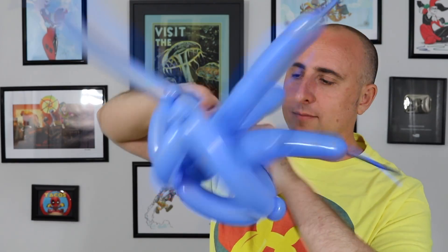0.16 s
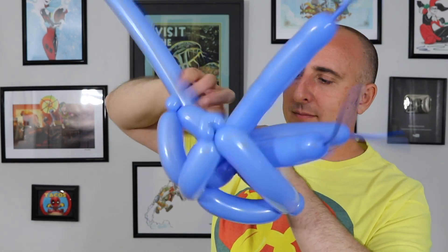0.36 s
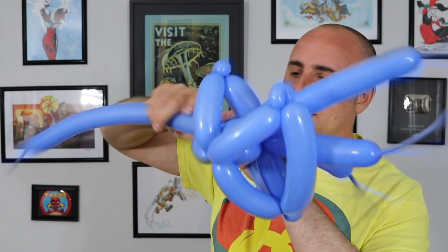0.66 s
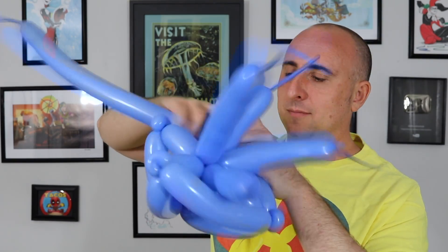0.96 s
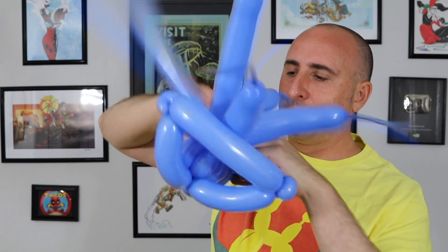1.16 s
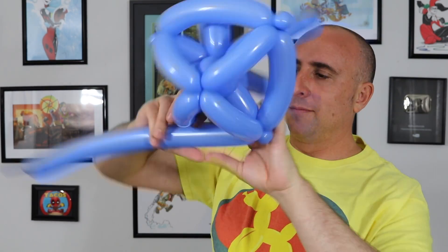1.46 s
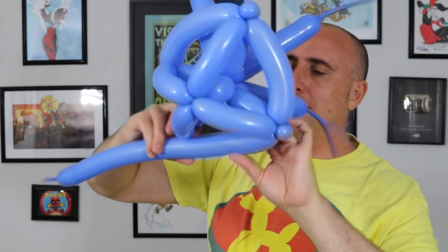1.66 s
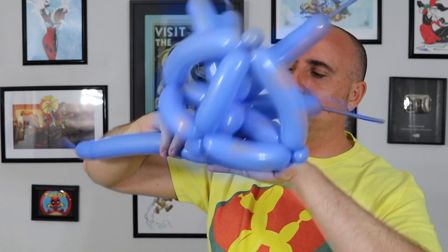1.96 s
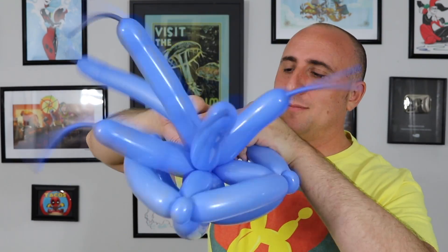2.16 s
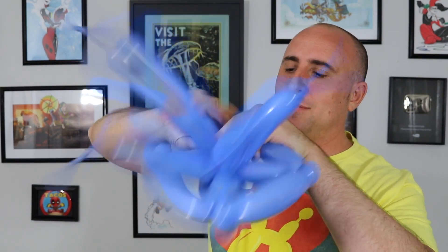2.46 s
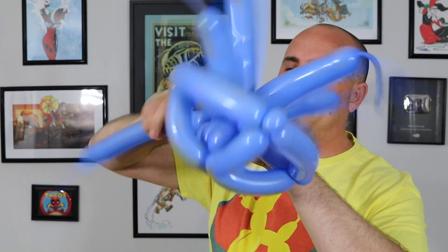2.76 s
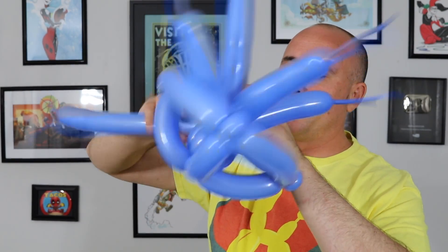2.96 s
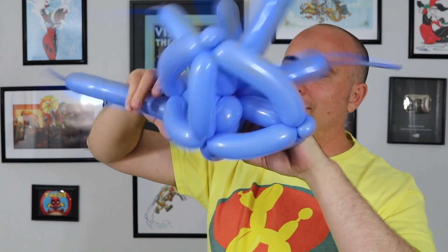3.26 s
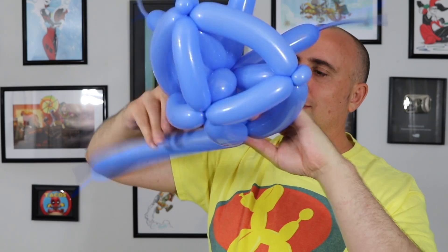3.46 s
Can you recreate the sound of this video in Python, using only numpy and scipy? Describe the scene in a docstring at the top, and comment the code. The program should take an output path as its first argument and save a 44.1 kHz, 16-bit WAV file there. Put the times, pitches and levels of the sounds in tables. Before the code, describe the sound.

Inflated rubber balloons rub, creak and squeak as hands twist them together in a small room

```python
"""A small room, the microphone close to inflated latex balloons that are being twisted together.
Rubber sticks and slips: each slip cracks the taut skin and rings the air inside. Slow slips creak,
fast ones scrape, regular ones squeak; snaps and separate creak pulses are short cracks of rubber
letting go. Hands brush the skins throughout, and a soft knock sounds near the end. Short
reverberation and faint room air surround it all."""
import sys
import numpy as np
from scipy import signal
from scipy.fft import rfft, irfft, next_fast_len
from scipy.io import wavfile

SR = 44100
rng = np.random.default_rng(int(sys.argv[2]) if len(sys.argv) > 2 else 0)


def wav_record(signal):
    """Record a signal, one row per channel, as 16-bit PCM in the file named by sys.argv[1]."""
    frames = np.transpose(np.atleast_2d(signal))
    bounded = np.clip(frames, -1, 1)
    # unit amplitude maps onto the largest positive 16-bit level
    quanta = np.round(bounded * 32767).astype(np.int16)
    wavfile.write(sys.argv[1], SR, quanta)


N = 158760  # 3.6 s
TOP_HZ = 15750  # upper limit of the sound


def undb(db):
    """Amplitude ratio of a level in dB."""
    return 10 ** (np.asarray(db) / 20)


def unit(x):
    """Scales a signal to an RMS of 1."""
    return x / np.sqrt(np.mean(x ** 2) + 1e-20)


def gain_at(hz, points):
    """Gain of a (freq_hz, level_db) curve, straight over log frequency."""
    points = np.array(points)
    return undb(np.interp(np.log(hz + 1), np.log(points[:, 0]), points[:, 1]))


def colour(x, points):
    """Minimum-phase filter that follows a (freq_hz, level_db) curve."""
    size = 2048
    cepstrum = irfft(np.log(gain_at(np.fft.rfftfreq(size, 1 / SR), points)))
    # fold the cepstrum forward in time to make the filter causal
    cepstrum[1:size // 2] *= 2
    cepstrum[size // 2 + 1:] = 0
    impulse_response = irfft(np.exp(rfft(cepstrum)))
    return signal.fftconvolve(x, impulse_response)[:len(x)]


def butter(x, order, hz, kind="low"):
    """Butterworth filter."""
    return signal.sosfilt(signal.butter(order, hz, kind, fs=SR, output="sos"), x)


def add(out, x, start_s):
    """Mixes a sound in at its start time, cut off at the end."""
    i = max(int(start_s * SR), 0)
    out[i:i + len(x)] += x[:max(len(out) - i, 0)]


def fade(t, t60):
    """Exponential decay by 60 dB in t60 seconds."""
    return np.exp(-np.log(1000) * t / t60)


def wander(t, rate, chance):
    """Random values, rate of them per unit of t, joined by straight lines."""
    return np.interp(t * rate, np.arange(len(chance)), chance)


# tone of the still room air: freq_hz, level_db
ROOM_AIR_TONE = [(25, -31), (60, -9), (120, 0), (300, 4), (1000, -2.5), (4000, -22), (16000, -26)]
AIR_DB = -68  # RMS


def background():
    """Still room air: steady noise, strongest in the lows."""
    return undb(AIR_DB) * unit(colour(rng.standard_normal(N), ROOM_AIR_TONE))


ROOM_T60_S, ROOM_TREBLE_T60_S = 0.28, 0.18
ROOM_DB, ROOM_GAP_S = -13.5, 0.0029  # tail level; silence before the first reflections


def room(x):
    """Short reverberation of a small room as decaying noise; the treble dies first."""
    t = np.arange(SR // 2) / SR
    noise = rng.standard_normal(len(t))
    low = butter(noise, 4, 4300) * fade(t, ROOM_T60_S)
    high = butter(noise, 4, 4300, "high") * fade(t, ROOM_TREBLE_T60_S)
    tail = (low + 0.85 * high) * (t > ROOM_GAP_S)
    tail /= np.linalg.norm(noise * fade(t, ROOM_T60_S))
    return x + undb(ROOM_DB) * signal.fftconvolve(x, tail)[:N]


# air modes rung by the soft knock: freq_hz, level_db, t60_s
KNOCK_MODES = [(226, -34.5, 0.099), (386, -28.5, 0.043), (680, -25, 0.014), (1450, -24, 0.017)]
BUMP_S, BUMP_RISE_S = 3.5805, 0.0022  # start and rise time


def bump():
    """A soft knock sets the air in one tube ringing: decaying sines with a rounded onset."""
    out, t = np.zeros(N), np.arange(SR // 10) / SR
    rise = np.sin(np.pi / 2 * np.minimum(t / BUMP_RISE_S, 1)) ** 2
    ring = sum(undb(db) * np.sin(2 * np.pi * hz * t) * fade(t, t60) for hz, db, t60 in KNOCK_MODES)
    add(out, rise * ring, BUMP_S)
    return out


RING_T60_S = 0.026  # waves running round inside the tubes


def ringing(x):
    """The short dense ring of the tubes alone, as decaying noise."""
    ring = rng.standard_normal(2048) * fade(np.arange(2048) / SR, RING_T60_S)
    return signal.fftconvolve(x, ring / np.linalg.norm(ring))[:N]


def grazing(grains, count):
    """Every grain lands on one of several tubes, each with its own ring."""
    tube = np.floor(rng.random(N) * count)
    return sum(ringing(grains * (tube == k)) for k in range(count))


# light brushing of hands on the skins, before the trim BRUSH_DB: time_s, level_db
BRUSHING_LEVEL = [(0, -41.5), (.28, -41.5), (.32, -69), (.375, -70), (.4, -45), (.5, -41.5), (.9, -47.5),
                  (.95, -43), (1.01, -45), (1.04, -59), (1.09, -52), (1.13, -39), (1.42, -47), (1.46, -67),
                  (1.57, -62), (1.66, -47), (1.77, -47.5), (1.8, -54.5), (1.89, -53), (1.93, -50),
                  (1.98, -45.5), (2.13, -47), (2.3, -42), (2.35, -51.5), (2.385, -42.5), (2.57, -44.5),
                  (2.625, -53.5), (2.68, -48), (2.76, -59), (2.83, -48), (2.94, -46), (3.06, -46.5),
                  (3.15, -54.5), (3.2, -63), (3.25, -66), (3.28, -48), (3.43, -45.5), (3.49, -63),
                  (3.6, -55)]
# tone of the brushing: freq_hz, level_db
BRUSHING_TONE = [(50, -26.5), (110, -15.5), (170, -7.5), (290, 1.5), (370, -3), (490, -3), (700, 0.5),
                 (1100, -1), (1450, -4), (1850, 3.5), (2400, -2), (3600, 2), (4800, -10), (8000, -21.5),
                 (12000, -29), (16000, -40)]
# low boom of the bundle as it is handled: time_s, level_db
BOOM_LEVEL = [(0, -80), (.28, -59), (.32, -87), (.37, -87), (.42, -62.5), (.85, -59.5), (1.4, -68),
              (1.55, -68.5), (2.2, -70.5), (3, -72.5), (3.25, -76), (3.6, -80)]
BRUSH_PER_S, BRUSH_SCATTER_DB = 2400, 2  # tiny slips; scatter of their strength
BRUSH_DB, BRUSH_RING_DB = -0.5, 2  # trim of the whole spray; ring against the bare grains
BOOM_HZ, BOOM_T60_S = 120, 0.12


def brushing():
    """Fingers and loose tubes graze the skins: tiny slips that also stir the bundle's lowest resonance."""
    t = np.arange(N) / SR
    hits = rng.random(N) < BRUSH_PER_S / SR
    grains = hits * rng.standard_normal(N)
    grains *= undb(BRUSH_SCATTER_DB * np.minimum(rng.exponential(size=N), 4))
    grains *= undb(3.55 * wander(t, 70, rng.standard_normal(512)))  # the level flickers
    spray = unit(colour(grains + undb(BRUSH_RING_DB) * grazing(grains, count=5), BRUSHING_TONE))

    resonance = np.cos(2 * np.pi * BOOM_HZ * t) * fade(t, BOOM_T60_S)
    boom = signal.fftconvolve(grains, resonance)[:N]
    boom = unit(butter(boom, 4, 90, "high"))

    spray_db = np.interp(t, *np.array(BRUSHING_LEVEL).T) + BRUSH_DB
    boom_db = np.interp(t, *np.array(BOOM_LEVEL).T)
    return spray * undb(spray_db) + boom * undb(boom_db)


# the balloons' response to a slip: freq_hz, level_db
SKIN_RESPONSE = [(50, -50), (120, -25.5), (220, -10), (330, -2.5), (480, 3.5), (650, -2.5), (1080, -3),
                 (1470, -4), (1850, -2.5), (2300, -3.5), (2800, -3.5), (3650, -2), (4200, -5.5), (5000, -9),
                 (8000, -13), (12000, -17.5), (16000, -28.5)]
# inflated tubes, nominal pitch, level before ring level and halving: freq_hz, level_db, t60_s
INFLATED_TUBES = [(460, -14, 0.011), (1080, -32, 0.049), (1820, -51, 0.1), (3540, -23, 0.1)]
MODE_SPREAD = 0.025  # relative scatter of the tube pitches
RING_TOP_HZ = 6540  # the ring is duller than the crack


def skin(slips, ring_db, chance):
    """Each slip gives a sharp crack, a dense ring particular to its spot, and tube modes the squeeze shifts."""
    t = np.arange(len(chance)) / SR
    ring = butter(chance, 2, RING_TOP_HZ) * fade(t, RING_T60_S)
    ring *= undb(ring_db) / np.linalg.norm(ring)
    ring[0] += 1  # the crack itself
    for (hz, db, t60), squeeze in zip(INFLATED_TUBES, chance[::-1]):
        shifted_hz = hz * (1 + MODE_SPREAD * squeeze)
        mode = np.cos(2 * np.pi * shifted_hz * t) * fade(t, t60)
        ring += undb(db + ring_db) * mode / np.linalg.norm(mode) / 2
    return colour(signal.fftconvolve(slips, ring), SKIN_RESPONSE)


# edges of body, middle, bite and sizzle (only the inner three split the sound): freq_hz
VOICE_EDGES_HZ = [150, 700, 2300, 4600, 15500]
CONTACT_DB, CONTACT_PEAKS_PER_OCTAVE = 3, 4.5  # resonances of each spot


def voice(x, band_db, length_s):
    """Sets body, middle, bite and sizzle of one contact; each spot on the skin has its own resonances."""
    size = next_fast_len(len(x) + 512)
    hz = np.fft.rfftfreq(size, 1 / SR)
    octaves = np.log2(1 + hz / VOICE_EDGES_HZ[1])
    resonances = wander(octaves, CONTACT_PEAKS_PER_OCTAVE, rng.standard_normal(64))
    spectrum = rfft(x, size) * undb(CONTACT_DB * resonances)
    # overlapping shares of the spectrum, one per band
    slopes = [1 / (1 + (hz / edge) ** 10) for edge in VOICE_EDGES_HZ[1:-1]]
    shares = np.diff([0 * hz] + slopes + [1 + 0 * hz], axis=0)
    # scale each band to its level
    power = 2 * shares @ np.abs(spectrum) ** 2 / size / (length_s * SR)
    gain = np.exp(np.log(undb(band_db) / np.sqrt(power + 1e-20)) @ shares)
    return irfft(spectrum * gain, size)[:len(x)]


# snaps and separate creak pulses, levels before the trim SNAP_DB:
# start_s, body_db, middle_db, bite_db, sizzle_db
SHORT_CRACKS = [(0.0193, -55, -36.5, -48, -65), (0.251, -73, -26, -26.5, -57), (0.446, -44, -39, -34, -39),
                (0.453, -48, -45, -31, -45), (0.6262, -54, -32, -37, -50), (0.894, -38, -30, -41, -38),
                (0.9202, -45, -26.5, -34.5, -44.5), (1.097, -53, -57, -32, -50),
                (1.2328, -36, -31, -32, -44), (1.2533, -34, -28, -28.5, -40), (1.2664, -39, -43, -34, -50),
                (1.293, -47, -27, -31, -40), (1.3472, -42, -35, -30, -42), (1.354, -39, -35, -36, -44),
                (1.4051, -27, -39, -35, -54), (1.408, -32.5, -27.5, -34, -55), (1.514, -46, -48, -49, -64),
                (1.608, -53, -55, -48, -52), (2.014, -43, -30.5, -42, -55),
                (2.1729, -34.5, -31.5, -28.5, -38), (2.278, -67, -31, -34.5, -42),
                (2.289, -55, -31, -34, -54), (2.3569, -52, -31, -45, -55), (2.3582, -45, -24.5, -44, -54),
                (2.429, -46, -52, -31, -38.5), (2.441, -39, -30.5, -32, -40), (2.559, -43, -33.5, -32, -35),
                (2.658, -45, -23.5, -28.5, -41), (2.7398, -56, -44, -33.5, -62),
                (3.043, -59, -32, -33, -44), (3.267, -53, -39, -44, -49), (3.3305, -55, -37, -29, -49),
                (3.3773, -72, -45, -30, -55), (3.3851, -59, -33, -38, -49),
                (3.393, -49.5, -27.5, -24.5, -40), (3.403, -68, -29, -30, -36.5),
                (3.4165, -57, -35.5, -29.5, -50)]
SNAP_DB, SNAP_RING_DB = -1.5, -4
SNAP_S = 0.0031  # length over which a crack's level counts


def snaps():
    """Snaps and separate creak pulses: short cracks of rubber letting go, one impulse each through the skin."""
    out, lead = np.zeros(N), 64  # samples ahead of the impulse
    for start, *band_db in SHORT_CRACKS:
        impulse = signal.unit_impulse(2 * lead, lead)
        crack = skin(impulse, SNAP_RING_DB, rng.standard_normal(2048))
        add(out, voice(crack, band_db, SNAP_S), start - lead / SR)
    return out * undb(SNAP_DB)


# squeaks, nominal pitch, level before the tube ring and edge fades:
# start_s, length_s, first_pitch_hz, last_pitch_hz, level_db, roughness (0-1)
SQUEAK_LIST = [(0.3076, 0.015, 1311, 1670, -24.5, 0.16), (0.323, 0.014, 1880, 1870, -24.5, 0),
               (.336, 0.0051, 1800, 1400, -35, 0.5), (.341, 0.011, 1406, 1350, -33, 0.64),
               (0.267, 0.025, 865, 952, -36.5, 0.16), (3.025, 0.00685, 1624, 2033, -24, 0.2),
               (3.159, 0.0087, 892, 918, -34, 0.08)]
# strength of a squeak's partials: freq_hz, level_db
SQUEAK_TONE = [(600, -34), (1300, -12), (1850, 2), (2500, -2.5), (3100, -0.5), (3800, 7), (4500, -16.5),
               (6000, -5.5), (8500, -15.5), (12000, -25.5), (16000, -30)]
SQUEAK_JITTER, SQUEAK_RASP, SQUEAK_SCRAPE = 0.06, 1.3, 0.6  # pitch, partials, noise at roughness 1
SQUEAK_HISS = 0.16  # noise of a smooth squeak
SQUEAK_EDGE_S, SQUEAK_RING_DB = 0.0032, -3.5  # fade in and out; ring of the tubes


def squeaks():
    """The slips lock into a gliding pitch; its cycles waver and the rubber scrapes along with them."""
    out = np.zeros(N)
    for start, length, first_hz, last_hz, db, rough in SQUEAK_LIST:
        chance, noise = rng.standard_normal((22, 256)), rng.standard_normal(4096)
        t = np.arange(int((length + SQUEAK_EDGE_S) * SR)) / SR
        hz = np.interp(t, [0, length], [first_hz, last_hz])
        hz = hz * (1 + SQUEAK_JITTER * rough * wander(t, 740, chance[0]))
        phase = 2 * np.pi * np.cumsum(hz) / SR
        tone = np.zeros(len(t))
        for k in range(1, 20):
            strength = gain_at(k * hz, SQUEAK_TONE) * (k * hz < TOP_HZ)
            flutter = 1 + SQUEAK_RASP * rough * np.sqrt(k) * wander(t, 550, chance[k])
            tone += strength * np.sin(k * phase) * flutter
        scrape = colour(noise[:len(t)] * (1 + np.cos(phase)), [(300, -36)] + SQUEAK_TONE)
        scrape_gain = SQUEAK_HISS + SQUEAK_SCRAPE * rough
        sound = unit(unit(tone) + scrape_gain * unit(scrape))
        edges = np.clip(np.minimum(t, t[-1] - t) / SQUEAK_EDGE_S, 0, 1)
        add(out, sound * undb(db) * edges, start)
    return out + undb(SQUEAK_RING_DB) * ringing(out)


RASP_DB, RASP_T60_S, RASP_FROM_HZ = 2, 0.017, 4500  # the ragged treble of each slip
RASP_SCATTER_DB, RASP_PER_S = 3, 447  # flicker of the rasp
TICK_HZ, TICK_DB = 240, 4  # slips this slow all tick; the faster the slips, the fewer of them tick


def rasping(slips, rate):
    """Each slip tears loose in many tiny jerks, so its treble is a ragged rasp; some stay sharp ticks."""
    t = np.arange(len(slips)) / SR
    noise, pick, flicker = rng.standard_normal(8192), rng.random(8192), rng.standard_normal(256)
    tear = fade(t, RASP_T60_S) ** 2
    energy = np.abs(signal.fftconvolve(slips ** 2, tear / tear.sum())[:len(t)])
    rasp_db = RASP_DB + RASP_SCATTER_DB * wander(t, RASP_PER_S, flicker)
    rasp = np.sqrt(energy) * np.resize(noise, len(t)) * undb(rasp_db)
    ticking = np.resize(pick, len(t)) < (TICK_HZ / rate) ** 3
    ticks = slips * ticking * undb(TICK_DB)
    return butter(slips, 3, RASP_FROM_HZ) + butter(rasp + ticks, 3, RASP_FROM_HZ, "high")


SPOT_CHANGES_PER_S = 90  # chances for a new spot
RING_DB, SLIP_TOP_HZ = -2.5, 750  # ring level at this slip rate, above which jitter grows no further


def sliding(slips, rate, count):
    """The contact slides over the rubber, so the ring changes from spot to spot; slow slips crack drier."""
    step = (np.arange(len(slips)) * SPOT_CHANGES_PER_S / SR).astype(int)
    spot = np.floor(rng.random(64) * count)[step]
    ring_db = RING_DB + 10 * np.log10(rate / SLIP_TOP_HZ)
    return sum(skin(slips * (spot == k), ring_db, rng.standard_normal(2048)) for k in range(count))


# rubbing strokes, nominal slip rate, levels before the trim RUB_DB:
# start_s, length_s, slips_per_s, body_db, middle_db, bite_db, sizzle_db
STROKES = [(0, 0.045, 670, -57, -46.5, -43.5, -51), (0.051, 0.014, 570, -54, -52, -55, -54),
           (0.091, 0.027, 730, -55, -41.5, -48, -52), (0.117, 0.027, 670, -45, -42, -37.5, -47.5),
           (0.167, 0.023, 780, -52, -45, -48, -55), (0.194, 0.018, 610, -60, -39.5, -35, -45.5),
           (0.216, 0.052, 760, -65, -65, -62, -52), (0.241, 0.017, 440, -65, -37.5, -33, -46.5),
           (0.271, 0.027, 870, -56, -37, -40.5, -48), (0.372, 0.067, 750, -65, -62, -46, -59),
           (0.429, 0.039, 626, -49.5, -43, -39.5, -48.5), (0.507, 0.051, 780, -50, -43, -41, -46),
           (0.559, 0.035, 610, -46, -41, -39.5, -48), (0.647, 0.042, 565, -50.5, -41.5, -40.5, -47.5),
           (0.696, 0.023, 700, -39.5, -36.5, -42.5, -43), (0.759, 0.041, 700, -45.5, -45, -42, -47),
           (0.815, 0.012, 890, -44.5, -36, -41.5, -49.5), (0.851, 0.042, 394, -45, -50, -44, -53),
           (0.883, 0.023, 456, -53, -37, -35, -47), (0.921, 0.013, 430, -50, -37.5, -46, -47),
           (0.968, 0.012, 475, -38, -49, -52, -67), (0.992, 0.013, 750, -44, -49, -55, -75),
           (1.098, 0.047, 550, -56, -62, -41.5, -48), (1.122, 0.059, 396, -63, -42.5, -41, -49),
           (1.188, 0.0087, 490, -38, -26.5, -35, -46.5), (1.258, 0.03, 420, -42, -35.5, -42, -53),
           (1.274, 0.059, 380, -42.5, -42.5, -44, -58), (1.305, 0.015, 470, -41, -33, -36, -41),
           (1.348, 0.018, 410, -45, -39, -44, -53), (1.371, 0.02, 433, -38, -34.5, -37, -48.5),
           (1.394, 0.0062, 455, -31, -49, -51, -70), (1.398, 0.014, 375, -37, -28.5, -31, -47),
           (1.412, 0.0047, 374, -40, -43, -31.5, -41.5), (1.429, 0.011, 330, -49, -49, -56, -67),
           (1.482, 0.049, 390, -61, -59, -53.5, -74), (1.62, 0.054, 470, -60, -50, -45, -57.5),
           (1.647, 0.041, 490, -58, -51, -53, -51.5), (1.685, 0.013, 550, -38, -30.5, -32, -40),
           (1.7, 0.026, 322, -40, -33.5, -29.5, -40), (1.736, 0.024, 374, -46.5, -51, -43, -61),
           (1.806, 0.028, 660, -90, -53, -51, -59.5), (1.835, 0.013, 420, -45.5, -34.5, -42, -44.5),
           (1.847, 0.041, 540, -49.5, -42, -46.5, -55.5), (1.891, 0.022, 385, -55, -50, -48, -80),
           (1.952, 0.043, 760, -51, -43, -44, -52), (2.018, 0.021, 510, -41.5, -35.5, -39, -47),
           (2.039, 0.025, 740, -58, -44.5, -48, -50), (2.071, 0.019, 394, -46, -37, -42.5, -52),
           (2.092, 0.016, 590, -51, -41, -39, -49), (2.118, 0.01, 440, -44.5, -59, -53, -70),
           (2.157, 0.029, 570, -42, -45, -39, -47.5), (2.192, 0.032, 510, -68, -45, -45, -55.5),
           (2.242, 0.039, 720, -87, -48.5, -48.5, -54), (2.277, 0.022, 374, -47.5, -42, -44, -56),
           (2.381, 0.02, 570, -99, -36.5, -40.5, -50), (2.425, 0.038, 486, -46, -46, -36.5, -47),
           (2.465, 0.091, 560, -60, -42, -45, -55), (2.54, 0.023, 305, -41, -34.5, -34.5, -43),
           (2.638, 0.017, 580, -48, -44, -44, -59), (2.654, 0.009, 670, -39.5, -36.5, -32, -45),
           (2.666, 0.028, 590, -51, -75, -36.5, -59), (2.703, 0.05, 710, -65, -51, -46, -66),
           (2.74, 0.022, 550, -53.5, -47, -41.5, -51), (2.768, 0.023, 720, -46.5, -48.5, -55, -67),
           (2.858, 0.032, 770, -53.5, -42.5, -37, -51.5), (2.898, 0.036, 800, -56, -35, -38, -52),
           (2.975, 0.0066, 600, -42.5, -40, -39, -58), (2.994, 0.007, 700, -42.5, -35, -26, -48),
           (3.01, 0.028, 700, -71, -39.5, -42, -56), (3.027, 0.0061, 870, -56, -30, -32.5, -39),
           (3.09, 0.026, 540, -56.5, -44.5, -37, -78), (3.121, 0.048, 910, -78, -48, -46, -54.5),
           (3.154, 0.015, 830, -50, -36.5, -29.5, -45), (3.172, 0.0087, 690, -55, -28, -33.5, -41.5),
           (3.275, 0.011, 510, -45, -33.5, -31.5, -41), (3.292, 0.019, 460, -62, -36.5, -34, -45.5),
           (3.313, 0.0074, 310, -46, -26.5, -26.5, -53), (3.329, 0.015, 370, -54, -29.5, -30, -41.5),
           (3.346, 0.014, 570, -75, -33, -30.5, -38.5), (3.366, 0.063, 200, -70, -57, -59, -48.5),
           (3.408, 0.02, 325, -68, -36.5, -38, -62), (3.512, 0.042, 370, -58, -51, -46.5, -51.5),
           (3.56, 0.0065, 630, -40, -44, -34, -44)]
RUB_DB, RUB_SWELL_DB = -1, 2.5
RUB_ATTACK_S, RUB_RELEASE_S = 0.00087, 0.0059
SLIP_JITTER, GRIP_WANDER = 0.5, 0.2  # log scatter of each gap; slow log drift of the gaps
SLIP_SCATTER_DB = 3  # scatter of slip strength


def rubs():
    """Uneven trains of slips that swell and ease off as the rubber is dragged."""
    out = np.zeros(N)
    for start, length, rate, *band_db in STROKES:
        gap, size, grip = rng.standard_normal((3, 2048))
        drift = GRIP_WANDER * wander(np.arange(len(gap)), 0.12, grip)
        jitter = SLIP_JITTER * min(rate / SLIP_TOP_HZ, 1) * gap
        at = np.cumsum(np.exp(jitter + drift)) / rate  # slip times in s
        at -= at[0]
        at = at[at < length + 3 * RUB_RELEASE_S]

        press = np.minimum(0.5 + at / RUB_ATTACK_S, 1)
        press *= np.exp(-np.maximum(at - length, 0) / RUB_RELEASE_S)
        press *= undb(RUB_SWELL_DB * np.sin(np.pi * np.minimum(at / length, 1)))
        strength = press * undb(SLIP_SCATTER_DB * np.clip(size[:len(at)], -2, 2))

        # one impulse per slip, with room for the ring after the last
        slips = np.bincount((at * SR).astype(int) + 32, strength, int(at[-1] * SR) + 512)
        rubbed = sliding(rasping(slips, rate), rate, count=3)
        add(out, voice(rubbed, band_db, length), start)
    return out * undb(RUB_DB)


def scene():
    """The balloons and hands sound in the room, over its still air."""
    air = background()
    balloons = brushing() + rubs() + snaps() + squeaks() + bump()
    return (air + room(balloons))[None]


def record(dry):
    """The recorder cuts the top with a steep low-pass."""
    return signal.sosfilt(signal.ellip(10, 0.1, 80, TOP_HZ, fs=SR, output="sos"), dry)


dry = scene()
out = record(dry)
wav_record(out)
```